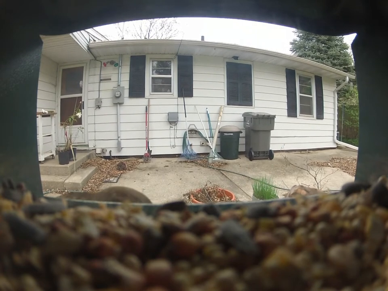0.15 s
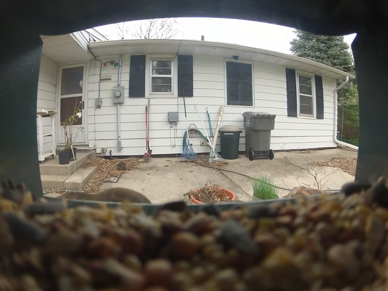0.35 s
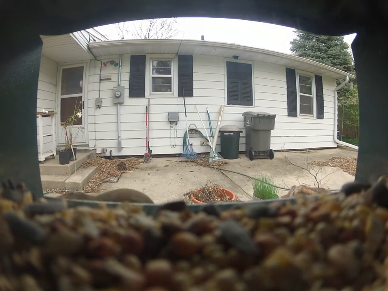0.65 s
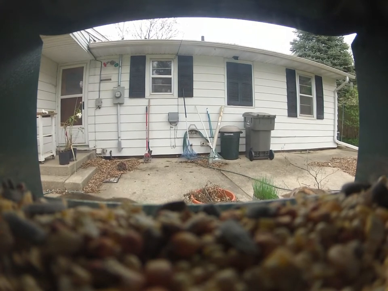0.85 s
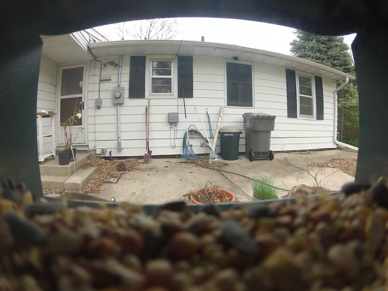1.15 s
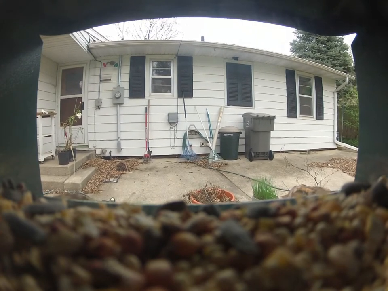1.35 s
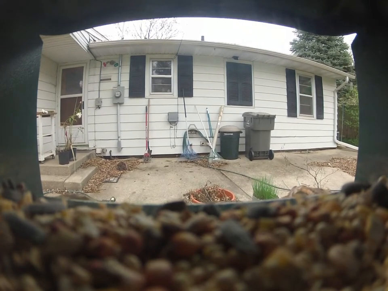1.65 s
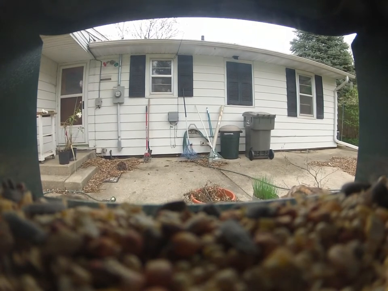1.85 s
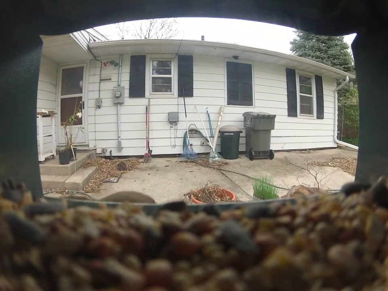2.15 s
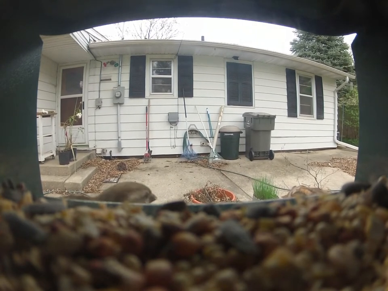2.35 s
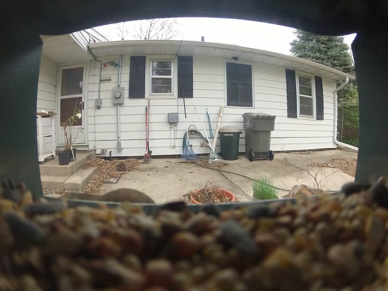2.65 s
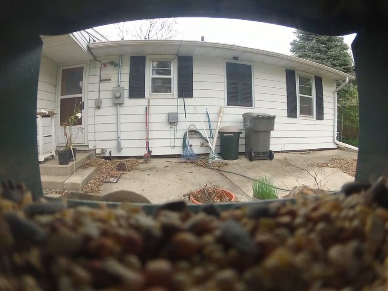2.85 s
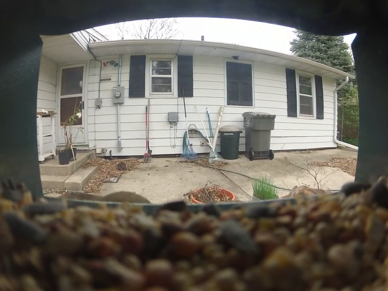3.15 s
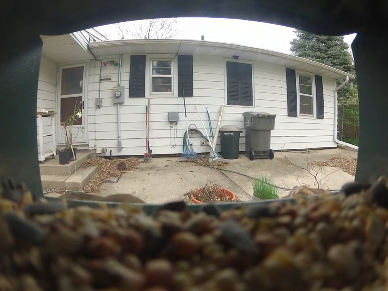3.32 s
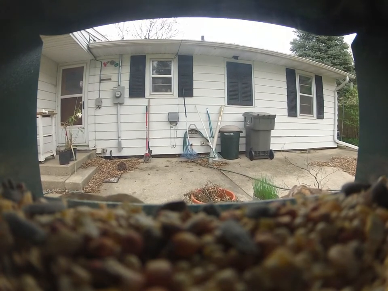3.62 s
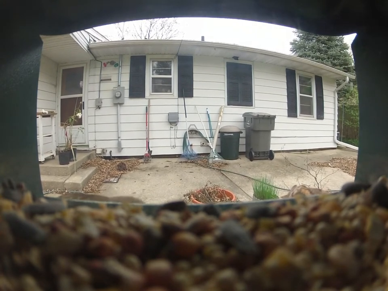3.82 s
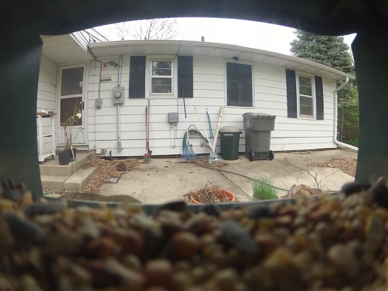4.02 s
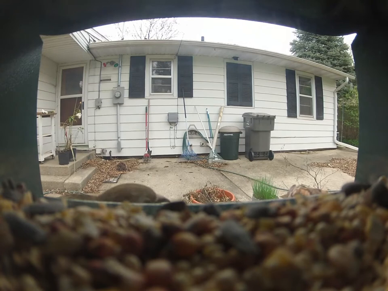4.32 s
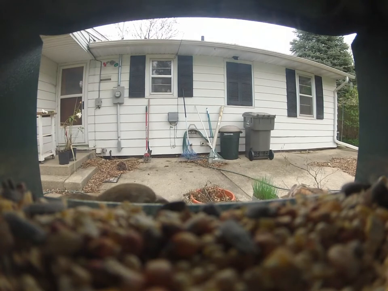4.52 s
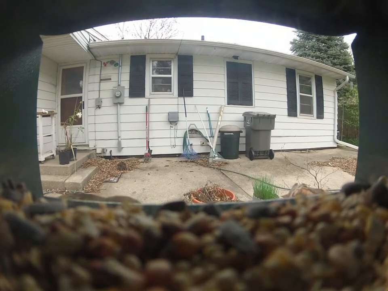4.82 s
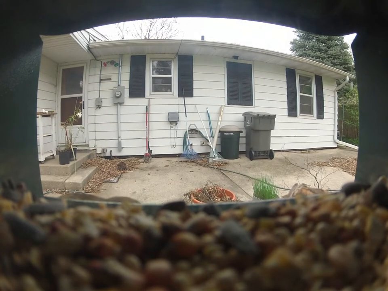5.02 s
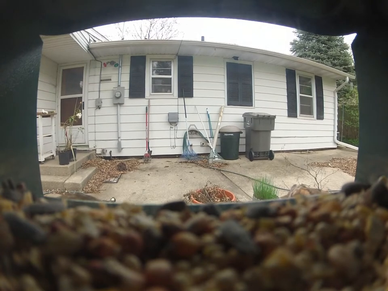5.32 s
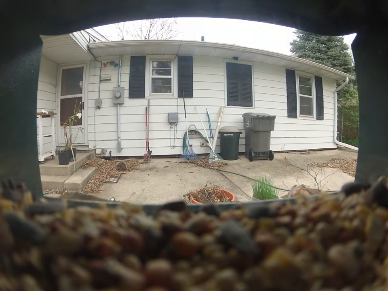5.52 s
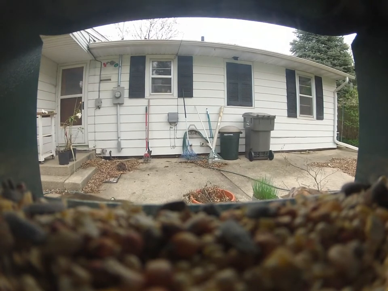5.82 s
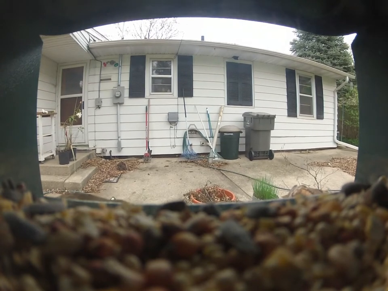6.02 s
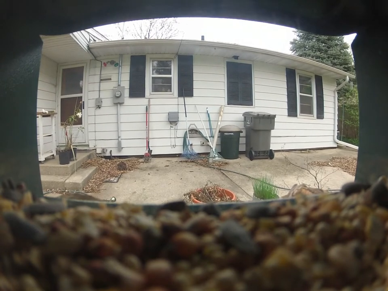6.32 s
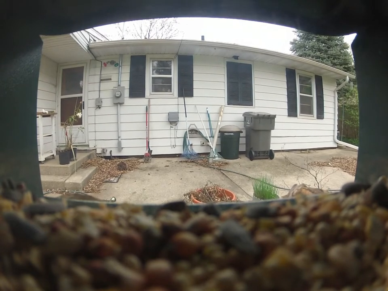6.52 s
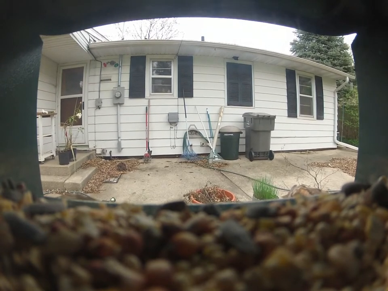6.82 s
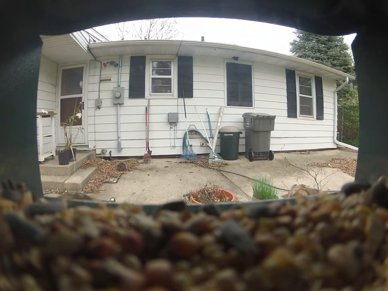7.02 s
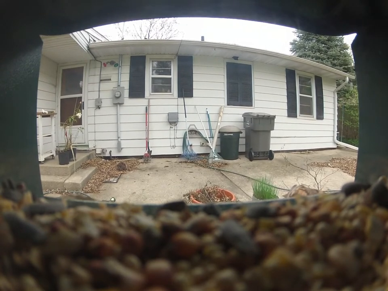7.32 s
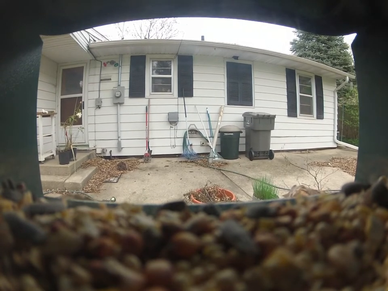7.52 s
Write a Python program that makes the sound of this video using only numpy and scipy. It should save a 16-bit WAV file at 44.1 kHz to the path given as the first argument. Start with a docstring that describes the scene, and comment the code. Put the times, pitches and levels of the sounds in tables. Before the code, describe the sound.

Close, boxy beak taps and ticking seeds in irregular bursts, with short feeder hums, faint distant chirps and soft outdoor rumble.

```python
"""In a rumbling yard a small bird pecks at a plastic seed feeder; a microphone housing sits among the seed.
Shaped noise makes the rumble, and short warbled whistles make another bird chirping far off.
Each peck is a burst of tiny contacts that sets the housing and tray ringing; seeds tick as they roll during
each bout of pecks, single seeds drop, and the feeder hums and trembles after hard pecks. The recorder adds
hiss, samples at 12 kHz and holds each value, which mirrors the sound into the treble."""
import sys
import numpy as np
from scipy import signal
from scipy.fft import rfft, irfft, next_fast_len
from scipy.io import wavfile

SR = 44100
rng = np.random.default_rng(int(sys.argv[2]) if len(sys.argv) > 2 else 0)


def materialize(psi):
    """Save the field psi as 16-bit PCM at rate SR to the path in sys.argv[1].

    A 1-D psi becomes a single channel; in a 2-D psi each row is a channel.
    """
    bounded = np.clip(np.atleast_2d(psi).T, -1, 1)
    quanta = np.round(bounded * 32767).astype(np.int16)
    wavfile.write(sys.argv[1], SR, quanta)


N = 338247

# tone of the yard's rumble: (frequency [Hz], relative level [dB])
YARD_SPECTRUM = [(12, -40.5), (20, -24), (43, -5), (85, -3.5), (123, -2), (253, -7), (326, -8),
                 (367, -11.5), (412, -11.5), (584, -17), (908, -22), (1170, -23), (5200, -30.5),
                 (6760, -37), (11400, -120)]
# tone of the hiss from each channel's own amplifier: (frequency [Hz], relative level [dB])
HISS_SPECTRUM = [(12, -30.5), (20, -6), (210, -9), (402, -12.5), (532, -18.5), (2100, -20.5), (5200, -19.5),
                 (6760, -36), (11400, -120)]
# far bird, two-note calls: (time [s], level [dB])
PAIR_CALLS = [(-.057, -69), (1.49, -71), (2.944, -68.5), (4.449, -68), (5.938, -69)]
# far bird, single falling calls in between: (time [s], level [dB])
FALL_CALLS = [(.735, -72.5), (2.348, -69.5), (3.708, -67.5), (5.237, -69.5)]
# a high note in two voices, then a rising one:
# (delay [s], length [s], first pitch [Hz], last pitch [Hz], level [dB], warble depth [share of pitch])
PAIR_NOTES = [(.006, .045, 5020, 4820, -5.5, 0.017), (.006, 0.063, 4640, 4560, -3, .016),
              (.061, .06, 2950, 3680, -.1, .045)]
# the falling note, same columns as above
FALL_NOTES = [(0, .07, 3780, 2880, 0, 0.042)]
# beak and seed knocks: (time [s], strength [dB], tray thump against strength [dB],
# upper housing tones against strength [dB], time the contact takes to die down [s])
PECKS = [(0.448, -38.5, 0, -15, 0.0034), (0.461, -29.5, -12, -18, 0.005), (0.471, -27.5, -2, 2.5, 0.0086),
         (0.487, -36.5, 1.5, -14, 0.0099), (0.511, -45, 3, -0.5, 0.004), (0.535, -41.5, 2, -2.5, 0.0057),
         (0.558, -40.5, 5.5, -8, 0.0064), (0.577, -49, 6, -11, 0.005), (0.587, -45, -4, 0.5, 0.0027),
         (0.621, -50, 5, 2.5, 0.0054), (0.909, -47.5, 3, -19, 0.003), (0.924, -35, -2, -17, 0.004),
         (0.935, -27, -1, -6, 0.0054), (0.941, -23.5, -7, -8, 0.0054), (0.957, -34.5, -3, -13, 0.0084),
         (1.343, -29, 0, -11, 0.0053), (1.354, -30, -5, -24, 0.0045), (1.37, -8.5, -14.5, -14, 0.0042),
         (1.393, -15.5, -4, -13.5, 0.0065), (1.4, -16, -7.5, -16.5, 0.002), (1.404, -8, -16.5, -18, 0.0014),
         (1.416, -24, -6, -12, 0.0054), (1.437, -41, 8.5, -17, 0.0038), (1.523, -47, 4.5, 1, 0.0026),
         (1.925, -43.5, 7, -14, 0.0039), (1.939, -37, -13, -5, 0.0057), (1.951, -34.5, -8, 1.5, 0.0061),
         (2.879, -38, -23, -23, 0.0034), (2.891, -36, -12, -24, 0.0049), (2.9, -36.5, -1.5, -12, 0.0073),
         (2.932, -46, 4, -1, 0.0021), (2.942, -52, -6, 4.5, 0.003), (2.962, -41, 2.5, -5.5, 0.0034),
         (3.185, -36.5, -7, -29, 0.0034), (3.206, -36.5, -6, -17, 0.003), (3.21, -31.5, -19, -19, 0.0035),
         (3.224, -43, -3, -3, 0.0036), (3.263, -43, -14, 3.5, 0.0053), (3.281, -36.5, -24, 0.5, 0.0075),
         (3.308, -40.5, -1, -5, 0.0077), (3.327, -44, -1, -0.5, 0.0048), (3.962, -31.5, 0, -3, 0.0055),
         (5.354, -47, -0.5, -12, 0.0057), (5.367, -45, -3, -4, 0.0036), (5.38, -44.5, 2.5, 7.5, 0.0027),
         (5.898, -36, -0.5, -21, 0.0022), (5.916, -39, -0.5, -13.5, 0.0021),
         (7.013, -45.5, 5.5, -11, 0.0026), (7.053, -40, 6, -17, 0.0024), (7.06, -26.5, 3.5, -15, 0.0031),
         (7.072, -38.5, -6, 3.5, 0.0061), (7.084, -21.5, -5, -9, 0.0067), (7.088, -8, -3.5, -10.5, 0.0026),
         (7.104, -31, 1.5, -6.5, 0.0089), (7.123, -36.5, 4, -12, 0.014), (7.54, -40, 2, -11, 0.0024),
         (7.547, -34.5, 0, -13.5, 0.0039), (7.559, -34, -8, -12, 0.0096), (7.571, -38.5, 5, -8, 0.0021),
         (7.581, -40, -2, -16, 0.006)]
# ringing tones of the housing round the microphone: (pitch [Hz], level [dB], time to fall 60 dB [s])
HOUSING = [(764, -8, 0.0073), (1035, -4.5, 0.024), (1290, -7, 0.00824), (1490, -0.5, 0.01035),
           (1909, 2.5, 0.021), (2107, -0.5, 0.017), (2390, -3, 0.014), (3010, -10, 0.013),
           (3530, -13, 0.0089), (4100, -22.5, .008)]
# ringing tones of the tray under a blow: (pitch [Hz], level [dB], time to fall 60 dB [s])
TRAY = [(123.5, -7, 0.0994), (151, 3, 0.025), (192.8, -7.5, 0.062), (276, -4.5, 0.073),
        (347.2, -6.5, 0.078), (403.6, -3.5, 0.022), (556, -9, 0.027)]
# seeds rolling and ticking during each bout of pecks: (time [s], length [s], level [dB])
SLIDES = [(0.46, 0.31, -55.5), (0.915, 0.16, -54.5), (1.337, 0.35, -54), (1.903, 0.14, -60.5),
          (2.871, 0.23, -55.5), (3.187, 0.26, -55), (5.342, .09, -57), (5.892, 0.21, -60),
          (7.01, 0.21, -53), (7.55, 0.093, -60.5)]
# the feeder trembles after a hard peck:
# (time [s], hanger level [dB], wall level [dB], pitch at which the walls start strongest [Hz])
SHUDDERS = [(.48, -62, -51, 300), (.945, -72, -43.5, 253), (1.39, -41.5, -41.5, 270),
            (2.88, -62, -50.5, 298), (3.19, -50.5, -47, 260), (3.964, -48.5, -56, 186),
            (7.1, -38.5, -37.5, 186), (7.55, -63, -51, 257)]
# ringing tones of the trembling walls: (pitch [Hz], level [dB], time to fall 60 dB [s])
WALLS = [(171, -2, 0.12), (224.7, 0, 0.073), (263.8, -5, 0.16), (349.4, -2.5, 0.12)]
# single seeds drop on the housing: (time [s], strength [dB], favoured pitch [Hz])
DROPS = [(.647, -57, 1850), (.755, -53, 2100), (1.553, -50, 2150), (1.668, -49, 1100), (3.035, -50, 1900),
         (3.4, -56, 1900), (4.222, -43, 3080), (6.823, -51.5, 2300)]

YARD_DB, HISS_DB = -60, -75
WARBLE_HZ = 130
UPPER_HZ = 1450  # housing tones above this count as upper
SPOT_HZ, SPOT_SPREAD = 1996, 0.078  # pitch the struck spot favours; its spread from peck to peck, as a share
SEED_TICKS_PER_S, SEED_SPREAD_DB = 3500, 3
SEED_FADE_DB = 17  # lost by the end of a slide
SEED_ON_TRAY_DB = -6.5  # rolling seed also rattles the upper tray tones
HANGER_HZ, HANGER_WAVER = 121.9, 0.073  # the waver is a share of the pitch
HANGER_RISE_S, HANGER_DB_PER_S = 0.015, 75
HANGER_TWIN_HZ, TWIN_DB, TWIN_DB_PER_S = 143, 1, 249  # a second, short-lived swing beats with the hum
WALLS_RISE_S, WALLS_DB_PER_S = 0.004, 161  # the twin swing shares this rise
WALLS_TAIL_DB, TAIL_DB_PER_S = -11.5, 46  # a softer tremble that lasts longer
PANEL_REST_HZ, PANEL_SETTLE_S = 190, 0.52  # where the walls' strongest pitch settles, and how slowly
DROP_CONTACT_S = 0.0014
MUFFLE_HZ, TRAY_FLOOR_HZ = 3045, 85.2  # feeder sound weakens above the first and below the second
SAMPLER_CUT_HZ, CUTOFF_HZ = 5600, 15250  # treble cuts before and after the sampling


def amp(db):
    """Turn decibels into a plain multiplier."""
    return 10 ** (np.asarray(db) / 20)


def rms_one(x):
    """Scale to an average power of 1."""
    return x / np.sqrt(np.mean(x ** 2) + 1e-20)


def coloured(points, channels):
    """Shape random noise to a spectrum by scaling its frequencies, then scale it to power 1."""
    size = next_fast_len(N)
    hz = np.maximum(np.fft.rfftfreq(size, 1 / SR), 1)
    point_hz, point_db = np.transpose(points)
    gain = amp(np.interp(np.log(hz), np.log(point_hz), point_db))
    noise = rng.standard_normal((channels, size))
    return rms_one(irfft(rfft(noise) * gain, size)[:, :N])


def drift(rate):
    """Wander by chance: straight lines join random values (spread 1), drawn `rate` times a second."""
    knots = rng.standard_normal(int(N / SR * rate) + 2)
    return np.interp(np.arange(N) / SR * rate, np.arange(len(knots)), knots)


def fade(s, rise_s, db_per_s):
    """Gain that rises at time s and then dies steadily."""
    age = np.maximum(np.arange(N) / SR - s, 0)
    return (1 - np.exp(-age / rise_s)) * amp(-db_per_s * age)


def ring(force, hz, t60):
    """Ring like a struck object: a unit click starts a sine of height 1 that loses 60 dB in t60 seconds."""
    r = amp(-60 / (t60 * SR))
    w = 2 * np.pi * hz / SR
    return signal.lfilter([0, np.sin(w)], [1, -2 * r * np.cos(w), r * r], force + 1e-18)


def contact_force(k, hz, contact):
    """One blow on tone number k: a click plus a chatter of contacts that dies away."""
    age = np.arange(900) / SR
    swell = (1 - np.exp(-age / 0.00025)) * np.exp(-age / max(contact, 1e-4))
    chatter = rng.standard_normal(900) * swell
    chatter /= np.sqrt(np.sum(chatter ** 2))
    chatter[20] += 0.66 * (-1) ** k  # neighbouring tones start in opposite directions
    # even out how hard the chatter happens to drive this pitch, so the blow's strength sets the ring
    drive = abs(np.sum(chatter * np.exp(2j * np.pi * hz * age)))
    return chatter / (drive + 0.33)


def knocks(times, contacts, levels_db, spots_hz, modes, favour_db):
    """Blows set tones ringing; each tone loses favour_db per octave away from the struck spot's pitch."""
    out = np.zeros(N)
    for k, (hz, mode_db, t60) in enumerate(modes):
        force = np.zeros(N + 900)
        for s, contact, level_db, spot_hz in zip(times, contacts, levels_db, spots_hz):
            favour = amp(-favour_db * abs(np.log2(hz / spot_hz)))
            at = round(s * SR)
            force[at:at + 900] += amp(level_db + mode_db) * favour * contact_force(k, hz, contact)
        out += ring(force[:N], hz, t60)
    return out


def ticks(modes, per_s, spread_db):
    """Random contacts of uneven size, shared out among the ringing tones; power 1."""
    out = np.zeros(N)
    for hz, mode_db, t60 in modes:
        sizes = amp(spread_db * np.minimum(rng.exponential(1, N), 3))
        pushes = sizes * rng.choice([-1, 1], N)
        born = rng.random(N) < per_s / len(modes) / SR
        out += ring(amp(mode_db) * pushes * born, hz, t60)
    return rms_one(out)


def yard_rumble():
    """The yard is low-heavy noise whose level wanders a little, both slowly and faster."""
    level_db = YARD_DB + 1.03 * drift(1.615) + 0.55 * drift(11)
    return amp(level_db) * coloured(YARD_SPECTRUM, channels=1)[0]


def chirp_note(length, first_hz, last_hz, warble):
    """A whistle holds its pitch, then slides, with a fast warble on top."""
    age = np.arange(round(length * SR)) / SR
    hz = first_hz + (last_hz - first_hz) * (age / length) ** 2.44
    hz *= 1 + warble * np.sin(2 * np.pi * WARBLE_HZ * age + rng.uniform(0, 2 * np.pi))
    swell = np.sqrt(np.sin(np.pi * age / length))
    return swell * np.sin(2 * np.pi * np.cumsum(hz) / SR)


def chirps():
    """Far bird's whistles, broken by gusty air and blurred by many echoes off the houses."""
    out = np.zeros(N + SR)  # starts one second early
    for calls, notes in (PAIR_CALLS, PAIR_NOTES), (FALL_CALLS, FALL_NOTES):
        for s, call_db in calls:
            for delay, length, first_hz, last_hz, note_db, warble in notes:
                note = chirp_note(length, first_hz, last_hz, warble)
                at = round((1 + s + delay) * SR)
                out[at:at + len(note)] += amp(call_db + note_db) * note
    gusts = np.clip(0.81 + 0.5 * drift(90), 0, 2)
    out = out[SR:] * gusts
    echoes = np.zeros(round(0.031 * SR))
    echoes[rng.integers(1, len(echoes), size=30)] = 0.24 * rng.standard_normal(size=30)
    echoes[0] = 1  # the direct sound
    return signal.fftconvolve(out, echoes)[:N]


def pecks():
    """The beak shakes the housing and thumps the tray, and both ring."""
    s, peck_db, thump_db, upper_db, contact = np.transpose(PECKS)
    spots_hz = SPOT_HZ * np.exp(SPOT_SPREAD * rng.standard_normal(len(s)))
    lower = [mode for mode in HOUSING if mode[0] < UPPER_HZ]
    upper = [mode for mode in HOUSING if mode[0] > UPPER_HZ]
    return (knocks(s, contact, peck_db, spots_hz, lower, favour_db=1)
            + knocks(s, contact, peck_db + upper_db, spots_hz, upper, favour_db=6)
            + knocks(s, contact, peck_db + thump_db, spots_hz, TRAY, favour_db=1))


def rolling_seeds():
    """Rolling seeds tick on the housing in clumps; their soft contact drives the upper tones less."""
    modes = [(hz, mode_db - 6.3 * (hz > UPPER_HZ), t60) for hz, mode_db, t60 in HOUSING]
    modes += [(hz, mode_db + SEED_ON_TRAY_DB, t60) for hz, mode_db, t60 in TRAY[-3:]]
    t = np.arange(N) / SR
    slides = np.zeros(N)
    for s, length, db in SLIDES:
        slides += amp(db) * fade(s, 0.004, SEED_FADE_DB / length) * (t < s + length)
    clumps = amp(4.3 * drift(70))
    return slides * clumps * ticks(modes, SEED_TICKS_PER_S, SEED_SPREAD_DB)


def hanger_hum():
    """After a hard peck the hanger hums at an unsteady pitch, joined briefly by a second swing."""
    t = np.arange(N) / SR
    hz = HANGER_HZ * (1 + HANGER_WAVER * drift(18))
    hum = np.sqrt(2) * np.sin(2 * np.pi * np.cumsum(hz) / SR)
    twin = np.sqrt(2) * np.sin(2 * np.pi * HANGER_TWIN_HZ * t)
    hum_gain = sum(amp(db) * fade(s, HANGER_RISE_S, HANGER_DB_PER_S) for s, db, *_ in SHUDDERS)
    twin_gain = sum(amp(db + TWIN_DB) * fade(s, WALLS_RISE_S, TWIN_DB_PER_S) for s, db, *_ in SHUDDERS)
    return amp(3.4 * drift(20)) * hum * hum_gain + twin * twin_gain


def wall_tremble():
    """Shifting seed keeps the walls trembling while their strongest pitch settles to its rest."""
    t = np.arange(N) / SR
    wall_hz = np.array(WALLS)[:, :1]
    gains = 0  # one row for each wall tone
    for s, _, walls_db, panel_hz in SHUDDERS:
        settling = np.exp(-np.maximum(t - s, 0) / PANEL_SETTLE_S)
        panel_now = PANEL_REST_HZ + (panel_hz - PANEL_REST_HZ) * settling
        dying = fade(s, WALLS_RISE_S, WALLS_DB_PER_S)
        dying += amp(WALLS_TAIL_DB) * fade(s, WALLS_RISE_S, TAIL_DB_PER_S)
        # each tone loses 18 dB per octave away from the strongest pitch
        gains = gains + dying * amp(walls_db - 18 * abs(np.log2(wall_hz / panel_now)))
    out = np.zeros(N)
    for (hz, mode_db, t60), gain in zip(WALLS, gains):
        out += amp(mode_db) * gain * ticks([(hz, 0, t60)], 150, spread_db=1.5)
    return out


def drops():
    """A falling seed touches briefly and wakes the housing tones near its spot's pitch."""
    s, drop_db, spots_hz = np.transpose(DROPS)
    return knocks(s, [DROP_CONTACT_S] * len(s), drop_db, spots_hz, HOUSING, favour_db=17.5)


def scene():
    """Feeder sound is muffled by the housing; all sound reaches one microphone port, so both channels match."""
    surroundings = yard_rumble() + chirps()
    feeder = pecks() + rolling_seeds() + hanger_hum() + wall_tremble() + drops()
    feeder = signal.sosfilt(signal.butter(3, MUFFLE_HZ, fs=SR, output="sos"), feeder)
    feeder = signal.sosfilt(signal.butter(3, TRAY_FLOOR_HZ, "high", fs=SR, output="sos"), feeder)
    return np.tile(feeder + surroundings, (2, 1))


def record(dry):
    """Add amplifier hiss, cut the treble, sample at 12 kHz, hold each value for four 48 kHz steps, cut the top."""
    x = dry + amp(HISS_DB) * coloured(HISS_SPECTRUM, channels=2)
    x = signal.sosfilt(signal.cheby1(8, 0.5, SAMPLER_CUT_HZ, fs=SR, output="sos"), x)
    sampled = signal.resample_poly(x, 40, 147, axis=1)  # 44.1 to 12 kHz
    held = np.repeat(sampled, 4, axis=1)
    x = signal.resample_poly(held, 147, 160, axis=1)[:, 5:]  # 48 to 44.1 kHz, start trimmed by 5 samples
    x = np.pad(x, ((0, 0), (0, 16)))[:, :N]
    return signal.sosfilt(signal.ellip(10, 0.5, 70, CUTOFF_HZ, fs=SR, output="sos"), x)


dry = scene()
out = record(dry)
materialize(out)
```